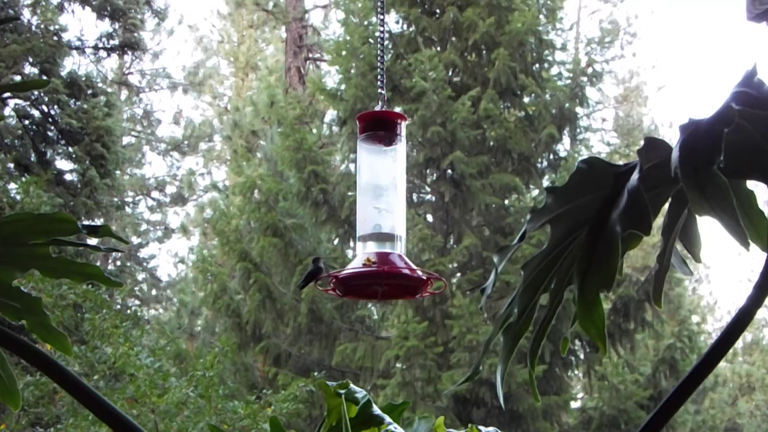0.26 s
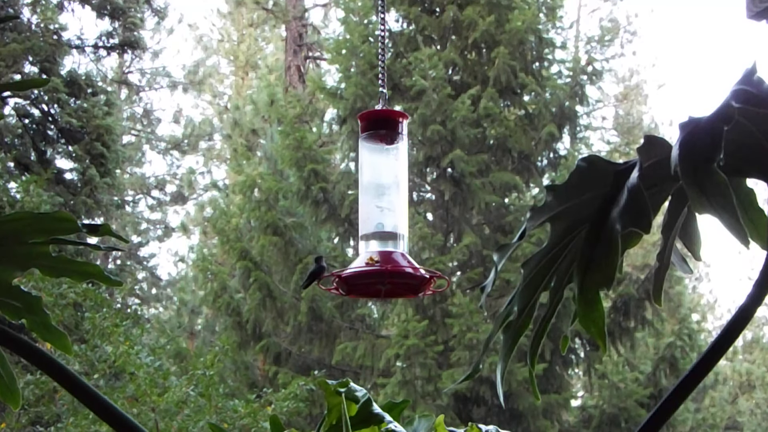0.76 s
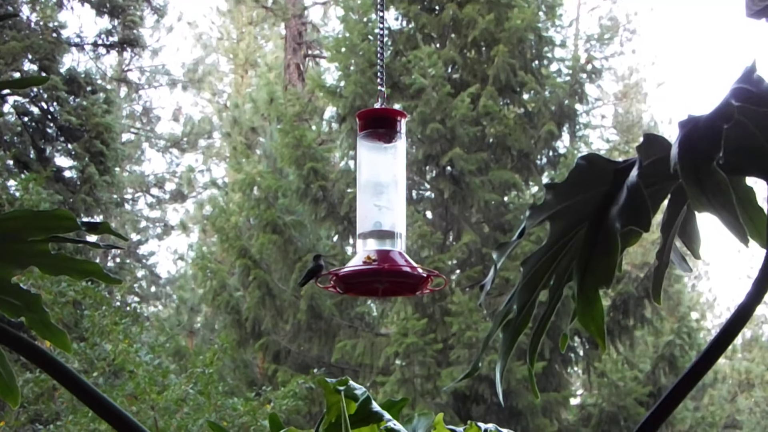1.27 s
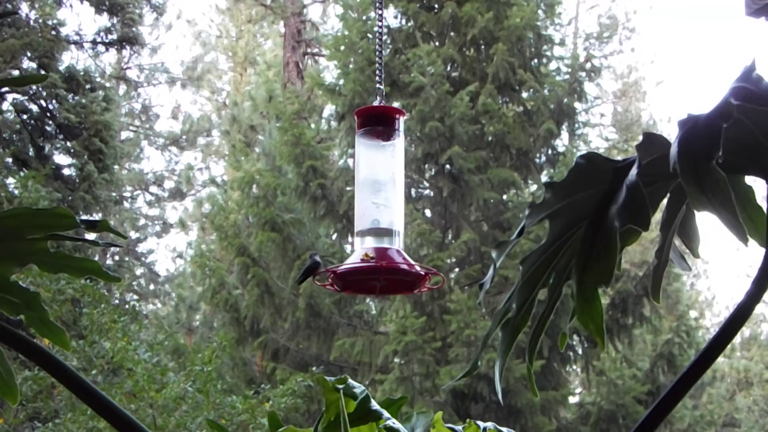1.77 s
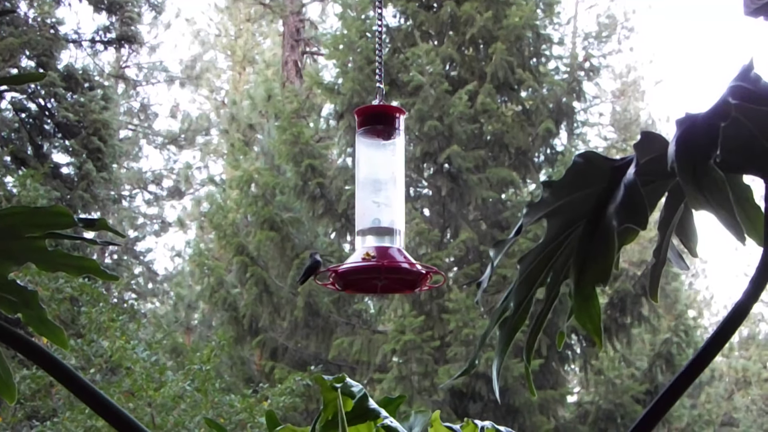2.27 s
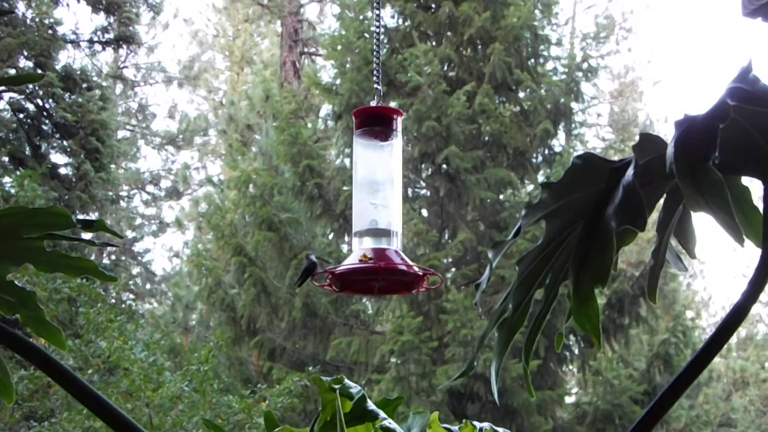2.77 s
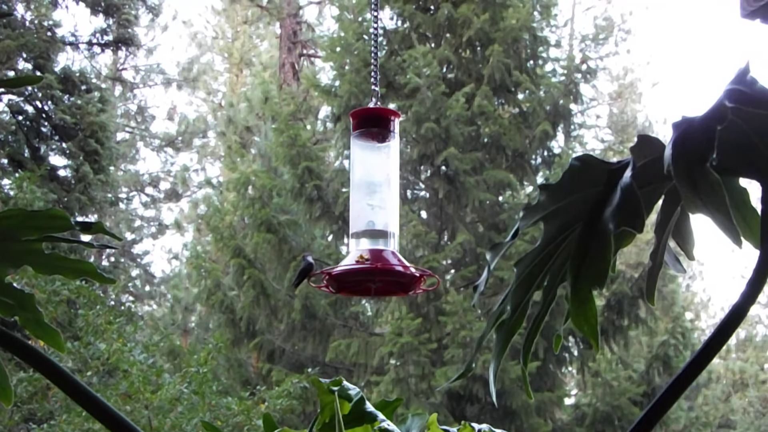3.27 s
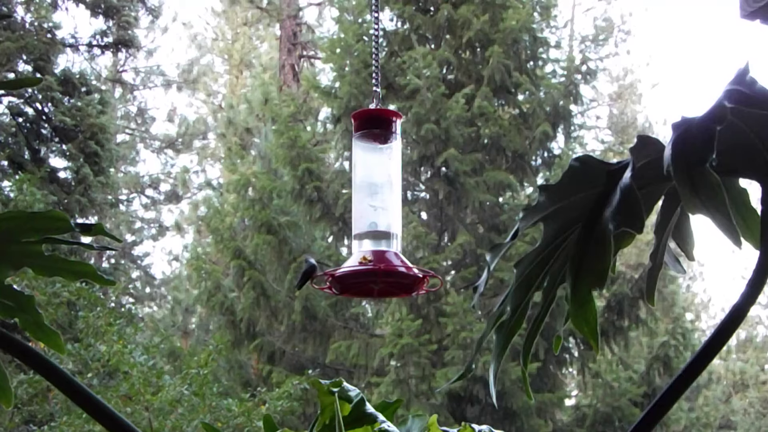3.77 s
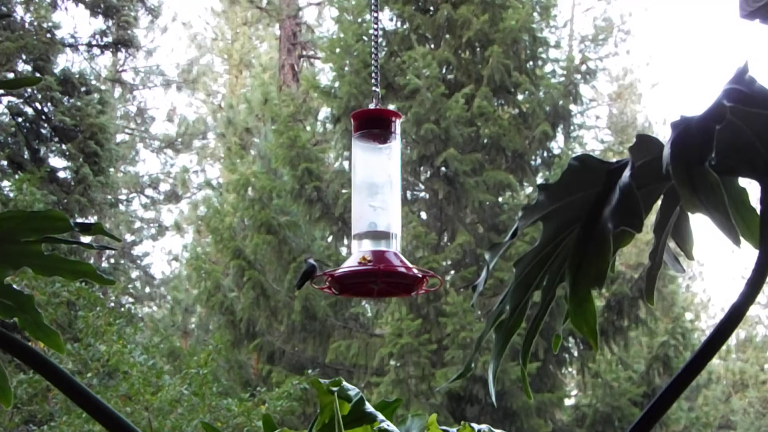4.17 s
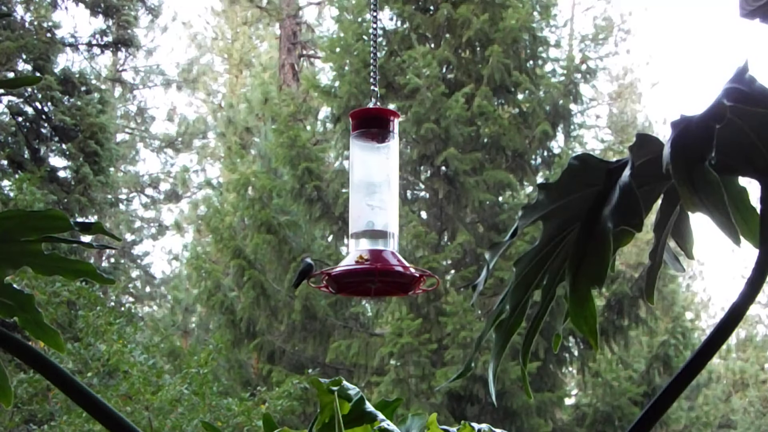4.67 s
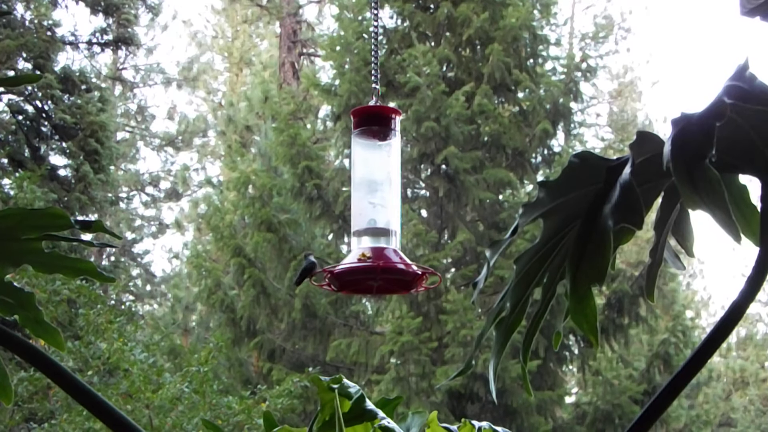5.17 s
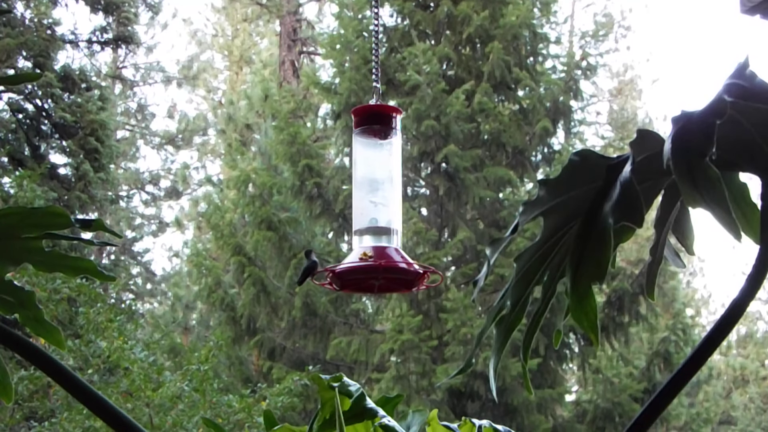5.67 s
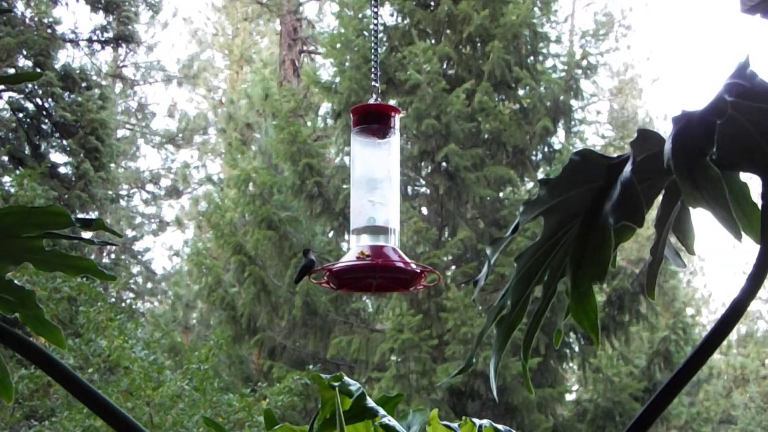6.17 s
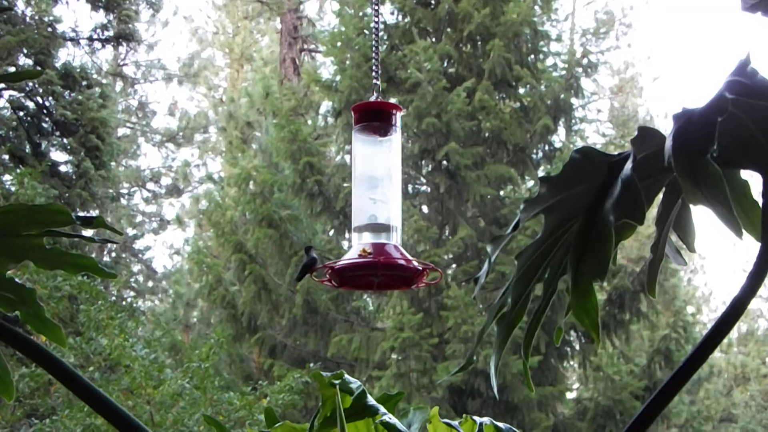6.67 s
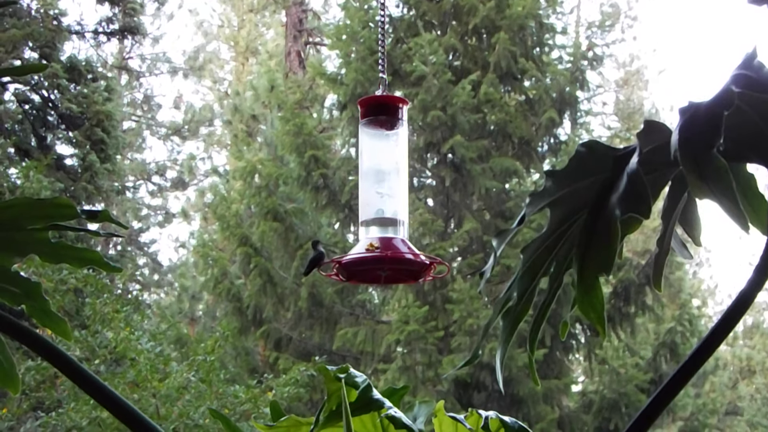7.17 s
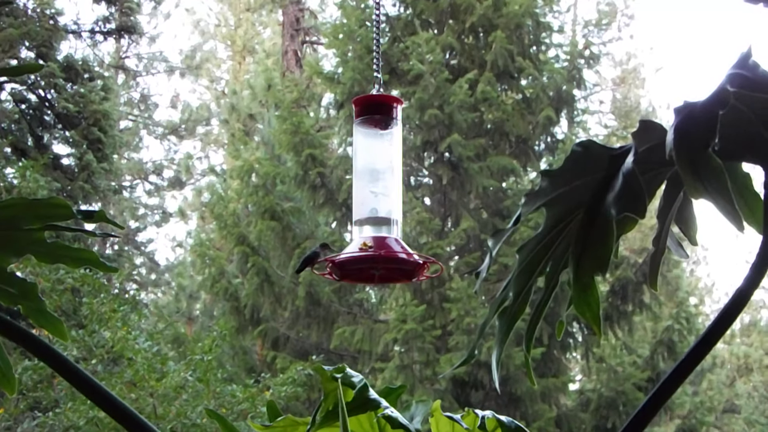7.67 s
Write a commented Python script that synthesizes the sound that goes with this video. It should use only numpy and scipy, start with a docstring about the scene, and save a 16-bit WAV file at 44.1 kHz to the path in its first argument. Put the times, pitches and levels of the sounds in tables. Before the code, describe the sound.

A quiet wooded yard with a steady, soft bed of distant rumble, leaves and hiss. In the first half second a faint hum swells three times, like far-off wings. Small birds give quick, high falling chips on and off until about 6.4 seconds, slightly to the right and softened by trees. Faint twig ticks are scattered throughout, and a thin arched whistle sounds at 1.1 seconds. Between 2.1 and 2.5 seconds a wooden door or board thuds several times, the last loudest, echoing off the forest while another bird rasps. Its harsh chatter returns from 4 to 4.7 seconds with short buzzy trills. Three closer, brief arched whistles come between 5.9 and 6.7 seconds, followed at once by a tight double thud with an echo. Raspy chatter and trills fill the last second, ending with two soft, lower bird notes near 7.8 seconds.

```python
"""A quiet wooded yard over a steady bed of distant rumble, leaves and recorder hiss. A faint hum swells
three times; small birds start their falling chips, twigs tick and an arched whistle rings, smeared by trees.
At 2.1-2.5 s a wooden door or board takes four thuds that echo off the forest, and another bird rasps.
Around 4 s its chatter returns with buzzy trills. Three more arched whistles lead to a double thud
at 6.7 s, then chatter, trills and two soft low notes close the scene."""
import sys
import numpy as np
from scipy import signal
from scipy.fft import rfft, irfft
from scipy.io import wavfile
from scipy.ndimage import uniform_filter1d

SR = 44100
rng = np.random.default_rng(int(sys.argv[2]) if len(sys.argv) > 2 else 0)


def digitize_waveform(pressure):
    """Quantize a signal to 16-bit integers and store it at the path in sys.argv[1].

    Rows of a 2-D input are taken as channels; values are limited to [-1, 1].
    """
    field = np.atleast_2d(pressure).T
    bounded = np.clip(field, -1, 1)
    quanta = np.round(bounded * 32767).astype(np.int16)
    wavfile.write(sys.argv[1], SR, quanta)


N = 349713


def undb(db):
    """Decibels to gain."""
    return 10 ** (np.asarray(db) / 20)


def unit(x):
    """Scale to rms 1."""
    return x / np.sqrt(np.mean(x ** 2))


def colour(x, table):
    """EQ a signal through (frequency [Hz], gain [dB]) points."""
    hz, db = np.transpose(table)
    f = np.arange(len(x) // 2 + 1) * SR / len(x) + 1
    return irfft(rfft(x) * undb(np.interp(np.log(f), np.log(hz), db)), len(x))


def add(out, x, s):
    """Mix x into out from time s."""
    i = int(s * SR)
    out[..., i:i + x.shape[-1]] += x[..., :N - i]


def decay(t, t60):
    """An envelope that falls 60 dB in t60 seconds."""
    return np.exp(-np.log(1000) * t / t60)


def wide(mid, side):
    """Left and right from mid and side."""
    return np.array([mid + side, mid - side])


def flutter(samples, smooth):
    """A random modulator of rms 1, averaged over `smooth` samples."""
    return unit(uniform_filter1d(rng.standard_normal(samples), size=smooth))


def air():
    """Distant rumble, leaves and recorder hiss: a steady, smooth bed."""
    # tone of the bed: (frequency [Hz], gain [dB])
    spectrum = [(8.8, -34), (15, 0.5), (50, -2.5), (150, -7), (260, -9), (369, -13), (509, -16),
                (994, -21.5), (1630, -25.5), (1890, -25.5), (2450, -27.5), (3910, -29.5), (15800, -35)]
    # stereo width: (frequency [Hz], side minus mid [dB])
    width = [(60, -4), (110, -2.5), (200, -5), (380, -4), (700, -4), (1290, -3), (2380, -3), (4400, -2.5),
             (8120, -2), (15000, -3)]
    mid, side = (colour(rng.standard_normal(N), spectrum) for _ in range(2))
    return wide(mid, colour(side, width)) * undb(-55) / np.std(mid)


def hum(hz=266, octave_db=-9, swell_s=0.038):
    """A faint tone with its octave that swells and fades, perhaps wings far off."""
    # swells: (centre time [s], level [dB])
    swells = [(.05, -63), (.23, -60.5), (.46, -58.5)]
    t = np.arange(N) / SR
    tone = np.sin(2 * np.pi * hz * t) + undb(octave_db) * np.sin(4 * np.pi * hz * t)
    return tone * sum(undb(db) * np.exp(-((t - s) / swell_s) ** 2 / 2) for s, db in swells)


def trees(x, tail_db, t60=0.25, slap_s=0.031, slap_db=-11):
    """Trunks and leaves scatter each sound into a short tail, with one slapback from a wall."""
    # tone of the tail, nearly flat, slightly brighter near 6 kHz: (frequency [Hz], gain [dB])
    leaves = [(2000, -3), (4000, -2.5), (6000, -1.5), (10000, -3)]
    t = np.arange(SR // 2) / SR
    envelope = decay(t, t60) * np.minimum(t / 0.0073, 1)
    mid, side = (colour(rng.standard_normal(len(t)), leaves) * envelope for _ in range(2))
    response = wide(mid, .5 * side) * undb(tail_db) / np.sqrt(np.sum(mid ** 2))
    response[:, 0] += 1  # direct sound
    response[:, int(slap_s * SR)] += undb(slap_db)
    return signal.fftconvolve(x[None], response, axes=1)[:, :N]


def twigs():
    """Twigs tick: a broad snap of noise with a brief ring."""
    # ticks: (time [s], relative level [dB], ring pitch [Hz])
    ticks = [(1.157, -53.5, 2490), (1.7, -57, 2390), (1.7107, -64, 3880), (1.838, -58.5, 6850),
             (2.134, -45.5, 890), (4.497, -55.5, 2000), (5.3068, -53, 2160), (5.611, -52, 1900),
             (5.993, -52.5, 2430), (6.3104, -55, 2200), (6.677, -56, 7940), (7.6488, -57.5, 2980)]
    out, t = np.zeros(N), np.arange(1500) / SR
    snap_band = signal.butter(2, [870, 5900], "band", fs=SR, output="sos")
    attack = np.minimum(t / 0.0021, 1)
    for s, db, hz in ticks:
        snap = unit(signal.sosfilt(snap_band, rng.standard_normal(len(t)))) * decay(t, 0.053)
        ring = 0.75 * np.sin(2 * np.pi * hz * t) * decay(t, 0.041)
        add(out, undb(db + 2) * (snap + ring) * attack, s)
    return out


def buzzes(depth=.09):
    """Buzzy trills: a tone whose pitch dips below a ceiling hundreds of times a second."""
    # trills: (time [s], length [s], level [dB], ceiling at start [Hz], ceiling at end [Hz])
    trills = [(.84, .12, -73, 4750, 4750), (3.903, 0.1, -57.5, 7070, 6600), (4.335, 0.11, -58, 6610, 6400),
              (6.871, 0.082, -54.5, 6720, 6950), (7.277, 0.13, -57, 6630, 6600)]
    out = np.zeros(N)
    for s, length, db, start_hz, end_hz in trills:
        count = int(length * SR)
        dips = np.abs(flutter(12000, smooth=110))[:count]
        hz = np.linspace(start_hz, end_hz, count) * (1 - depth * dips)
        add(out, undb(db) * np.sqrt(np.hanning(count)) * np.sin(2 * np.pi * np.cumsum(hz) / SR), s)
    return out


def twitter(calls, start_hz, length_s, rasp, fall, overtone, second_db=-99):
    """Harmonic calls that lose the share `fall` of their pitch; phase wobble smears them into a rasp."""
    # call-to-call scatter: (pitch [share], length [share], rasp [share])
    spread = (.008, .12, .15)
    out = np.zeros(N)
    scatter = 1 + np.array(spread) * rng.standard_normal((len(calls), 3))
    shapes = np.array([start_hz, length_s, rasp]) * scatter
    for (s, overtone_db, fundamental_db, upper_db), (hz, length, rough) in zip(calls, shapes):
        t = np.arange(int(length * SR)) / SR
        glide_hz = hz * (1 - fall * (t / length) ** .8)  # falls quickest at the start
        wobble = 1.9 * np.clip(rough, 0, 1) ** 2 * flutter(8000, smooth=24)[:len(t)]
        phase = 2 * np.pi * np.cumsum(glide_hz) / SR + wobble
        partials = [(1, fundamental_db - 3), (2, overtone_db + second_db),
                    (overtone, overtone_db - 6.5), (overtone + 1, upper_db + 0.5)]
        voice = sum(undb(db) * np.sin(k * phase) for k, db in partials)
        envelope = np.minimum(t / .0035, 1) * np.cos(np.pi / 2 * t / length) ** 0.31
        add(out, voice * envelope, s)
    return out


def chips():
    """Quick falling bird chips, most bright in the third harmonic, a few low and dull."""
    # chips, levels before the voice's trims: (time [s], third harmonic [dB], fundamental [dB])
    calls = [(0.182, -55, -67), (1.162, -60, -60), (1.26, -58, -63), (1.541, -52, -61), (1.611, -52, -61),
             (1.705, -60, -71), (1.996, -55, -65), (2.033, -50, -61), (2.102, -51, -61),
             (2.173, -50.5, -60), (2.415, -70, -62), (2.805, -52, -56), (2.886, -56, -57),
             (3.016, -74, -60), (3.165, -74, -59), (3.253, -52, -58.5), (3.316, -52.5, -61),
             (3.417, -68, -64), (3.545, -66, -61.5), (3.604, -54.5, -64), (3.644, -50.5, -60),
             (3.6765, -52.5, -60), (3.71, -48, -59), (3.788, -49, -63), (3.869, -52.5, -63),
             (4.015, -54, -62), (4.312, -54, -59.5), (4.387, -49.5, -59.5), (4.684, -50, -61),
             (4.785, -52.5, -61.5), (5.0925, -51.5, -59.5), (5.3935, -51.5, -61), (5.507, -52, -61.5),
             (5.81, -50.5, -61.5), (5.917, -47.5, -59), (5.985, -45, -60), (6.36, -49, -59)]
    # throat resonance: (frequency [Hz], gain [dB])
    throat = [(1500, 7.5), (2200, 0), (4500, -1.5), (6700, -1.5), (9000, -7.5), (10500, -14), (13000, -18)]
    with_fourth = [(s, db, fundamental_db, db - 6.5) for s, db, fundamental_db in calls]
    voice = twitter(with_fourth, start_hz=2486, length_s=.026, rasp=0.35, fall=.22,
                    overtone=3, second_db=-14)
    return colour(voice, throat)


def chatter():
    """Another bird's harsh chatter: longer calls with a heavy rasp."""
    # calls, levels before the voice's trims:
    # (time [s], second harmonic [dB], fundamental [dB], third harmonic [dB])
    calls = [(2.0594, -47, -52, -71), (2.1309, -52, -57, -71), (2.199, -74, -59, -76),
             (3.9542, -49, -76, -68), (4.0997, -54.5, -64, -66), (4.1804, -47.5, -59, -62),
             (4.2482, -47.5, -62, -69), (4.4029, -56, -71, -57), (4.533, -54, -68, -69),
             (4.6082, -50.5, -59, -59), (4.6952, -55, -60, -63), (6.0194, -60, -85, -58),
             (6.8, -50, -57, -58), (6.8753, -48.5, -63, -57), (6.929, -56, -67, -56),
             (6.9728, -59, -61, -77), (7.0494, -47.5, -60, -63), (7.1252, -48.5, -54, -58),
             (7.196, -56, -68, -55), (7.34, -55, -68, -53.5), (7.4697, -51, -63, -66),
             (7.552, -48.5, -60, -61), (7.621, -50, -60, -59.5), (7.702, -50, -57.5, -58),
             (7.7765, -52, -57, -61)]
    # throat resonance: (frequency [Hz], gain [dB])
    throat = [(1800, -8.5), (2800, -1), (4000, -7.5), (5500, -2), (9000, -1), (10500, -7.5), (13000, -15)]
    voice = twitter(calls, start_hz=2904, length_s=0.047, rasp=0.95, fall=.16, overtone=2)
    return colour(voice, throat)


def whistle(hz, db, octave_db, rough_rad, strain=0):
    """A fluttering sine with octave and twelfth; negative strain lifts them where the note is soft."""
    quick, slow = (flutter(6000, smooth)[:len(hz)] for smooth in (20, 120))
    phase = 2 * np.pi * np.cumsum(hz) / SR + rough_rad * quick
    gain = np.sqrt(2) * undb(db + 2.5 * slow) * signal.windows.tukey(len(hz), .15)
    overtone_gain = undb(octave_db + strain * (db - np.max(db)))
    return gain * (np.sin(phase) + overtone_gain * (np.sin(2 * phase) + 0.25 * np.sin(3 * phase)))


def soft_notes():
    """Short soft whistles, each bending along a parabola through three pitches."""
    # notes: (time [s], length [s], start [Hz], middle [Hz], end [Hz], level [dB], relative octave [dB])
    notes = [(1.722, 0.029, 3900, 4060, 3480, -59.5, -20), (1.752, 0.026, 2810, 2780, 3050, -58, -4.5),
             (1.776, 0.021, 4010, 4500, 4130, -61.5, -20), (5.293, 0.034, 3650, 4250, 4170, -59.5, -1.5),
             (5.923, 0.0183, 2910, 2960, 3200, -55, -20), (7.76, 0.035, 1063, 1056, 1070, -61.5, -20),
             (7.812, .028, 1280, 1275, 1258, -65.5, -41)]
    out = np.zeros(N)
    for s, length, start, middle, end, db, octave_db in notes:
        u = np.linspace(-1, 1, int(length * SR))
        hz = middle + (end - start) / 2 * u + ((start + end) / 2 - middle) * u ** 2
        add(out, whistle(hz, db, octave_db, rough_rad=.4), s)
    return out


def arched_whistles(start_share=.6, end_share=.72):
    """Loud whistles that swell as they climb, hold the top pitch and drop away."""
    # arches: (time [s], rise [s], hold [s], fall [s], top pitch [Hz], level [dB], end minus top [dB])
    arches = [(1.139, .015, 0.015, .012, 5890, -46, -22), (5.927, 0.032, 0.0056, 0.031, 5730, -47.5, -5),
              (6.323, .021, 0.0081, .019, 5670, -42.5, -10), (6.671, 0.027, 0.0092, 0.028, 5750, -42.5, -7)]
    # the beak colours the overtones: (frequency [Hz], gain [dB])
    beak = [(8300, 0), (9000, -14), (10600, -12), (11400, 0), (14000, -10)]
    out = np.zeros(N)
    for s, rise, hold, fall, top_hz, db, end_db in arches:
        t = np.arange(int((rise + hold + fall) * SR)) / SR
        to_climb = np.clip(1 - t / rise, 0, 1)
        fallen = np.clip((t - rise - hold) / fall, 0, 1)
        hz = top_hz * (1 - (1 - start_share) * to_climb ** 2 - (1 - end_share) * fallen ** 2)
        swell_db = -15.5 * to_climb + end_db * fallen ** 0.54
        add(out, whistle(hz, db + swell_db, octave_db=-16, rough_rad=0.17, strain=-0.88), s)
    return colour(out, beak)


def forest_echo(t, clack_db):
    """A blow's noise comes back from near walls (fast decay) and the forest (slow decay)."""
    # tone of the impact: (frequency [Hz], gain [dB])
    slam = [(25, -14.5), (60, -7), (85, -6.5), (115, -13.5), (180, -0.5), (260, -14.5), (400, -13),
            (700, -17.5), (1100, -17), (1600, -21), (2700, -29.5), (3700, -21.5), (5800, -24), (8000, -37),
            (12000, -50), (15000, -64)]
    # stereo width: (frequency [Hz], side minus mid [dB])
    width = [(60, -23), (110, -36), (200, -35), (380, -25), (700, -22), (1290, -26), (2380, -13),
             (4400, -12), (8120, -6), (15000, -3)]
    # echo bands: (centre [Hz], build-up [s], early t60 [s], late t60 [s], late minus early [dB])
    bands = [(40.6, 0.0033, 0.39, 1.45, -5), (117, 0.012, 0.4, 1.8, -17), (352, 0.001, 0.34, 1.71, -8),
             (1010, 0.0086, 0.39, 2.56, -11), (2360, 0.0015, 0.21, 1.93, -5.5),
             (4660, 0.017, 0.18, 1.46, -7.5), (8800, 0.096, 0.24, 0.74, 1.5)]
    log_centres = np.log(np.array(bands)[:, 0])
    log_hz = np.log(np.arange(len(t) // 2 + 1) * SR / len(t) + 1)
    mid, side = (colour(rng.standard_normal(len(t)), slam) for _ in range(2))
    clack = undb(clack_db * np.exp(-(log_hz - np.log(1100)) ** 2 / .5))  # fuller for a sharper edge
    spectrum = rfft(wide(mid, colour(side, width)) / np.std(mid)) * clack
    echo = 0
    for weights, (_, rise, early, late, late_db) in zip(np.eye(len(bands)), bands):
        band = irfft(spectrum * np.interp(log_hz, log_centres, weights), len(t))  # bands sum to the whole
        envelope = (1 - np.exp(-t / rise)) * (decay(t, early) + undb(late_db) * decay(t, late))
        echo = echo + band * envelope
    return echo


def thuds(wood_db=-36.5, echo_db=-30):
    """Each blow rings the modes of a door or board and sets off the echo; a softer blow is duller."""
    # blows: (time [s], gain [dB], boom [dB], clack [dB], low-pass [Hz], pitch [x], ring time [x])
    blows = [(2.097, -17.5, 2, 8, 497, 1.45, 0.72), (2.399, -19, 5, -6, 248, 0.88, 0.39),
             (2.477, -15.5, -6, 22, 577, 1.3, 0.27), (2.487, 0.5, -0.5, -2.5, 15000, 0.96, 0.69),
             (6.741, -10.5, 9.5, 1.5, 1510, 1.9, 0.38), (6.747, 0, 1.5, 1, 14100, 0.99, 0.85)]
    # wood modes, scaled for each piece struck: (frequency [Hz], relative level [dB], t60 [s])
    modes = [(167.6, -6, 1), (185.6, 5.5, 0.6), (326, -14, 0.42), (350, -30, 0.31), (417, -12.5, 0.83),
             (460, 0.5, 0.15), (530, -34, 0.31), (671, -4, 0.26), (1012, -5.5, 0.32), (1218, -6.5, 0.24)]
    out, t = np.zeros((2, N)), np.arange(int(1.5 * SR)) / SR
    attack = np.minimum(t / 0.00087, 1)
    for s, blow_db, boom_db, clack_db, bright_hz, pitch, sustain in blows:
        ring = 0
        for k, (hz, db, t60) in enumerate(modes):
            polarity = (-1) ** (k // 2)
            ring += polarity * undb(db) * np.sin(2 * np.pi * pitch * hz * t) * decay(t, sustain * t60)
        thud = undb(echo_db) * forest_echo(t, clack_db) + undb(wood_db + boom_db) * ring * attack
        lowpass = signal.butter(2, bright_hz, fs=SR, output="sos")
        add(out, undb(blow_db) * signal.sosfilt(lowpass, thud), s)
    return out


def scene(treble_right_db=3.5):
    """Birds, twigs, thuds and hum over the air bed, leaning right in the treble only."""
    far = trees(chips() + chatter() + buzzes(), tail_db=-1)
    close = trees(arched_whistles() + soft_notes() + twigs(), tail_db=-6.5)  # closer, so drier
    sources = far + close + thuds() + hum()
    left = colour(sources[0], [(1500, 0), (4000, -treble_right_db / 2)])
    right = colour(sources[1], [(1500, 0), (4000, treble_right_db / 2)])
    return np.array([left, right]) + air()


def record(dry, top_hz=15750):
    """A steep low-pass cuts the top."""
    return signal.sosfilt(signal.ellip(10, .2, 60, top_hz, fs=SR, output="sos"), dry)


dry = scene()
out = record(dry)
digitize_waveform(out)
```